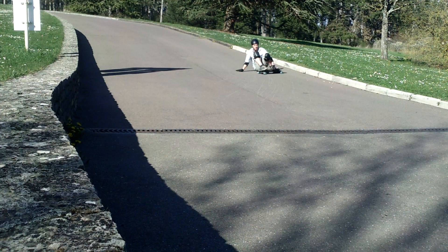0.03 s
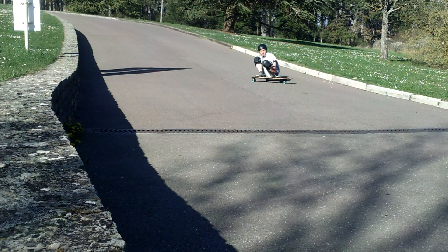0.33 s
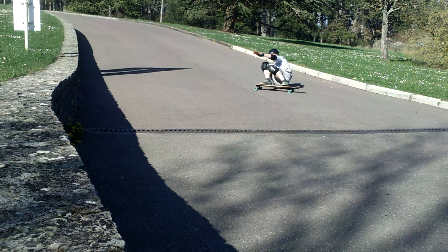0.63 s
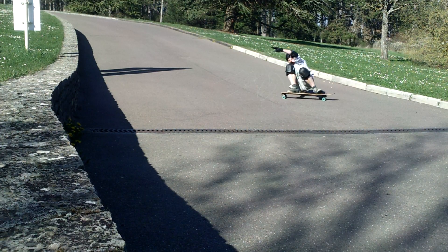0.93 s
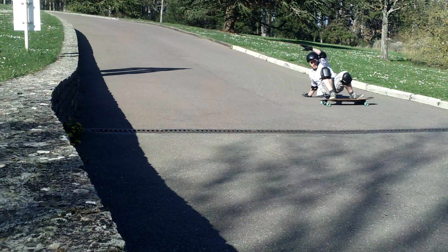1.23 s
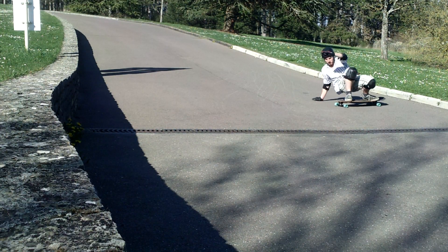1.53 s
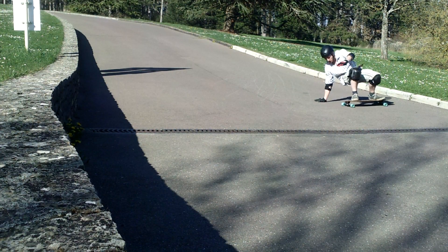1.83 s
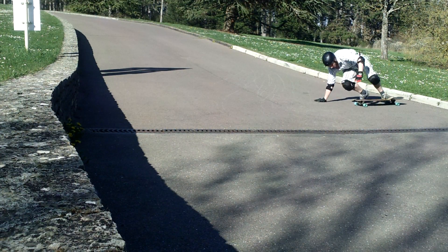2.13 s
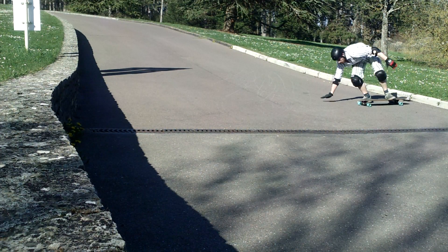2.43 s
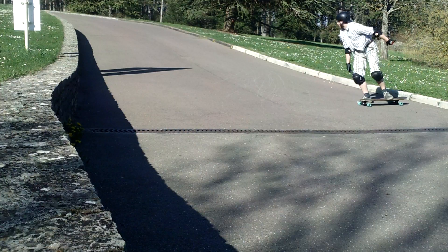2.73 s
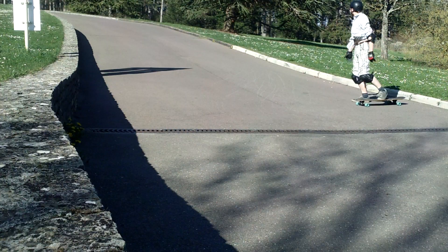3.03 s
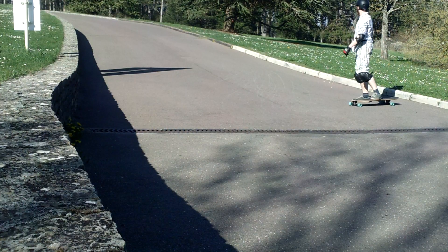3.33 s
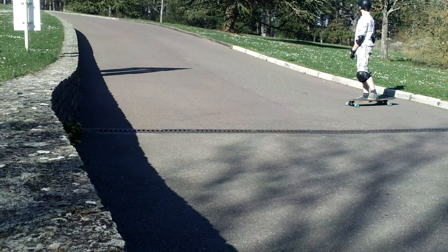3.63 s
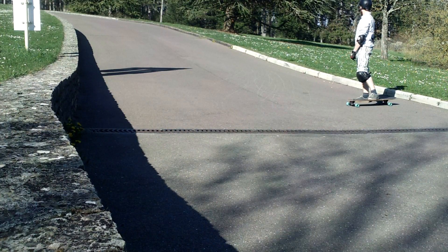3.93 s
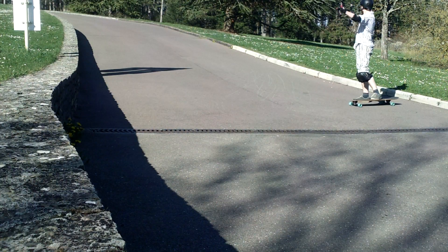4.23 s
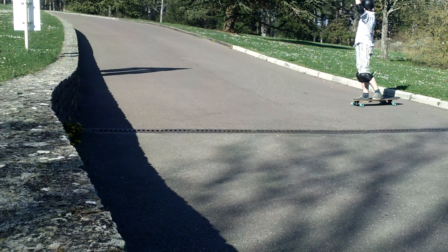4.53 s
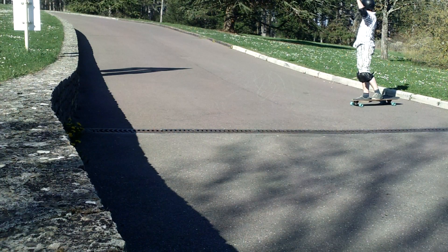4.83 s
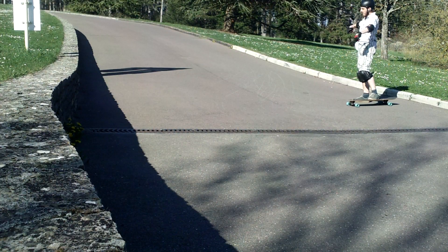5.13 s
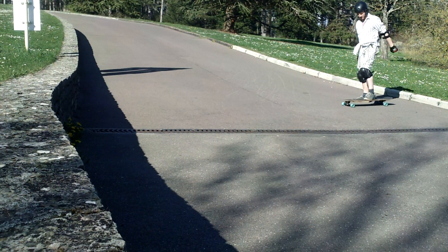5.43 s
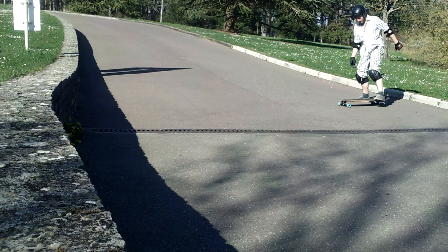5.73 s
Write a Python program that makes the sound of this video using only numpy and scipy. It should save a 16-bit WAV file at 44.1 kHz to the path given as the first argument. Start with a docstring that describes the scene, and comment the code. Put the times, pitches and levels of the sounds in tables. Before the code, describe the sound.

Longboard wheels rasp and squeal in a slide on asphalt, then gusts of wind buffet the microphone over faint birds.

```python
"""A longboard slides sideways down an asphalt park road. Its wheels stick and slip over the grit, so
they rasp, judder and squeal; stones crunch, a glove puck drags, a last short scrub stops the board
with a snap, and the deck clacks. As the board slows, gusts start to buffet the camera's microphone:
big eddies rumble, small ones slap the port. Small birds chirp in the trees over soft park air,
and the camera's electronics whine faintly."""
import sys
import numpy as np
from scipy import signal
from scipy.fft import rfft, irfft, next_fast_len
from scipy.io import wavfile
from scipy.ndimage import uniform_filter1d, map_coordinates

SR = 44100
rng = np.random.default_rng(int(sys.argv[2]) if len(sys.argv) > 2 else 0)


def bounce(signal):
    """Save signal as a 16-bit WAV file at the path given by the first command-line argument."""
    frames = np.transpose(np.atleast_2d(signal))
    limited = np.clip(frames, -1, 1)
    pcm = np.round(limited * 32767).astype(np.int16)
    wavfile.write(sys.argv[1], SR, pcm)


N = 260190
TIME_S = np.arange(N) / SR


def amp(db):
    """Decibels to gain."""
    return 10 ** (np.asarray(db) / 20)


def unit(x):
    """Scale to rms 1."""
    return x / np.sqrt(np.mean(x ** 2) + 1e-20)


def envelope(start_s, hold_s, attack_s, release_s):
    """Level in dB: 0 during the hold; attack and release are the times for 60 dB."""
    early_s = np.maximum(start_s - TIME_S, 0)
    late_s = np.maximum(TIME_S - start_s - hold_s, 0)
    return -60 * (early_s / attack_s + late_s / release_s)


def wobble(knots_per_s):
    """Smooth random curve."""
    steps = np.arange(0, N + 10, 10)
    curve = map_coordinates(rng.standard_normal(8192), [steps * knots_per_s / SR], mode="wrap")
    return np.interp(np.arange(N), steps, curve)


def colour(x, points):
    """Minimum-phase filter with the gain of the (Hz, dB) points."""
    size = 2 * next_fast_len(len(x) // 2 + SR // 10)
    hz, db = np.transpose(points)
    gain_db = np.interp(np.log(np.fft.rfftfreq(size, 1 / SR) + 1), np.log(hz), db)
    cepstrum = irfft(np.log(amp(gain_db)))
    cepstrum[1:size // 2] *= 2
    cepstrum[size // 2 + 1:] = 0
    return irfft(rfft(x, size) * np.exp(rfft(cepstrum)))[:len(x)]


def resonate(x, modes):
    """Ring x through (Hz, width Hz, dB) resonances with steep skirts."""
    size = 2 * next_fast_len(N // 2 + SR // 10)
    f = np.fft.rfftfreq(size, 1 / SR)
    response = sum(amp(db) * (2j * f * width / (hz * hz - f * f + 2j * f * width)) ** 2
                   for hz, width, db in modes)
    return irfft(rfft(x, size) * response)[:N]


def add(track, start_s, sound):
    """Mix a sound into the track."""
    start = max(round(start_s * SR), 0)
    track[start:start + len(sound)] += sound[:N - start]


# Each row: frequency in Hz, gain in dB.
AIR_SPECTRUM = [(60, 4.5), (170, -0.5), (300, -8), (900, -18), (2000, -23), (3200, -25.5), (4200, -22),
                (5400, -30.5), (9000, -30.5), (15600, -33.5), (17000, -39)]
def park_air(level_db=-50.5):
    """Soft, low noise that sways slightly."""
    return amp(level_db + 0.4 * wobble(2)) * unit(colour(rng.standard_normal(N), AIR_SPECTRUM))


# Each row: frequency in Hz, rms level in dB.
WHINE_TONES = [(7897, -72), (15735, -79.5)]
def camera_whine():
    """The electronics give thin tones with jittering phase."""
    return sum(amp(db) * np.sqrt(2) * np.sin(2 * np.pi * hz * TIME_S + .6 * wobble(50))
               for hz, db in WHINE_TONES)


# Each note shape: length in seconds, glide in octaves, arch in octaves, hoarseness 0-1.
WHISTLE, BUZZ = (0.06, 0, 0.008, 0.08), (0.08, -0.14, 0, 0.88)
RISE, FALL = (0.011, 0.38, 0.017, 0.24), (0.03, -0.16, 0.02, 0.12)
ARCH, SLUR = (0.088, -0.12, 0.23, 0.25), (0.038, 0.293, 0.035, 0.26)
# Each row: start in seconds, mid-note pitch in Hz, level in dB, note shape.
BIRD_NOTES = [(2.66, 4470, -58.5, BUZZ), (2.925, 4760, -63, WHISTLE), (3.002, 3380, -60, FALL),
              (3.057, 3640, -50.5, RISE), (3.183, 3380, -57, FALL), (3.263, 3220, -58, FALL),
              (3.659, 4020, -57.5, BUZZ), (3.842, 3300, -53.5, RISE), (4.01, 4770, -66, WHISTLE),
              (4.23, 3785, -57, ARCH), (4.405, 3580, -62, SLUR), (4.438, 4070, -62, WHISTLE),
              (5.21, 4026, -66, WHISTLE), (5.305, 3790, -60.5, ARCH)]
def birds(far_per_s=5, far_hz=3970, far_db=-65, waver=0.066, echo_db=-5, t60_s=0.59):
    """Gliding whistles, scattered by the trees; farther birds twitter at random."""
    track, drift = np.zeros(N), wobble(500)
    shapes = [WHISTLE, FALL, SLUR]
    draws = rng.random((int(far_per_s * N / SR), 2))
    far = [(when * (N / SR - .5), far_hz * 2 ** ((height - .5) / 2), far_db, shapes[i % len(shapes)])
           for i, (when, height) in enumerate(draws)]
    for start_s, middle_hz, db, (length_s, glide, arch, hoarse) in BIRD_NOTES + far:
        u = np.linspace(-1, 1, int(length_s * SR))
        pitch_hz = middle_hz * 2 ** (glide * u / 2 - arch * u ** 2)
        pitch_hz *= 1 + waver * hoarse * drift[int(start_s * SR):][:len(u)]
        swell = np.sqrt(np.abs(np.cos(np.pi * u / 2)))
        add(track, start_s, amp(db) * swell * np.sin(2 * np.pi * np.cumsum(pitch_hz) / SR))
    t = np.arange(SR // 2) / SR
    tail = rng.standard_normal(len(t)) * amp(-60 * t / t60_s)
    return track + amp(echo_db) * signal.fftconvolve(track, tail / np.linalg.norm(tail))[:N]


BREEZE_DB = -46
# Each row: start in seconds, hold in seconds, pressure level in dB.
GUSTS = [(1.218, 0.14, -29), (1.398, 0.091, -34.5), (2.195, 0.11, -26), (2.296, 0.2, -22),
         (2.54, 0.038, -21.5), (2.641, 0.058, -22), (2.736, 0.18, -20), (2.983, 0.34, -18),
         (3.378, 0.22, -18), (3.628, 0.12, -20.5), (3.765, 0.095, -21.5), (3.891, 0.096, -23),
         (4.044, 0.11, -24.5), (4.251, 0.12, -27.5), (4.848, 0.31, -29.5), (5.083, 0.041, -23.5)]
def airflow(attack_s=0.14, release_s=0.14, strong_gust_db=-17.5, strong_eddy_db=-22, eddy_growth=3.38):
    """Levels in dB of gusts over a light breeze, and of their small eddies, which grow much faster."""
    gusts_db = [db + envelope(start_s, hold_s, attack_s, release_s) for start_s, hold_s, db in GUSTS]
    pressure_db = np.maximum(np.max(gusts_db, axis=0), BREEZE_DB - 0.5 * wobble(18))
    return pressure_db, strong_eddy_db + eddy_growth * (pressure_db - strong_gust_db)


# Each row: frequency in Hz, gain in dB.
RUMBLE_SPECTRUM = [(10, -41.5), (25, -3.5), (45, 4), (70, 2.5), (130, -5.5), (200, -16.5), (400, -50),
                   (4000, -110)]
EDDY_SPECTRUM = [(40, -54), (130, 7.5), (210, 2), (320, -4.5), (480, -14), (700, -30), (1100, -52.5),
                 (8000, -103)]
def wind(pressure_db, eddy_db):
    """Big eddies rumble, small ones break on the microphone port; both flutter together."""
    flutter = wobble(45)
    rumble = unit(amp(2 * flutter) * colour(rng.standard_normal(N), RUMBLE_SPECTRUM))
    lumps = rng.standard_normal(N) * amp(2.2 * flutter + 6.5 * wobble(260))
    return amp(pressure_db - 1.2) * rumble + amp(eddy_db) * unit(colour(lumps, EDDY_SPECTRUM))


def vortex_swing(width_s):
    """Pressure swing of one vortex passing the port; smaller vortices sound higher."""
    u = np.arange(-(SR // 40), SR // 40) / SR / width_s
    shape = u / (1 + u * u) ** 2 * signal.windows.hann(len(u))
    return shape / shape.max()


# Each row: time in seconds, thud level in dB, wake level in dB.
SLAPS = [(1.267, -17.5, -48), (1.29, -11, -45), (1.318, -21.5, -50), (2.37, -12.5, -30),
         (2.384, -14.5, -33), (2.6, -19, -34), (2.621, -13, -28.5), (2.762, -32, -30), (2.786, -14.5, -33),
         (2.829, -9, -20.5), (2.837, -14, -20.5), (2.857, -10.5, -29), (2.895, -13, -22),
         (3.037, -13.5, -33), (3.106, -9, -17.5), (3.137, -6, -30.5), (3.265, -12, -16),
         (3.286, -6.5, -15.5), (3.37, -8.5, -11), (3.422, -13, -19), (3.452, -14, -37), (3.485, -14.5, -22),
         (3.535, -5, -16.5), (3.581, -14, -15.5), (3.617, -9.5, -29), (3.665, -12, -24), (3.681, -13, -26),
         (3.835, -12, -33.5), (4.078, -14.5, -36), (4.097, -13, -29.5), (4.309, -17.5, -70),
         (5.081, -20, -51)]
# Each row: frequency in Hz, gain in dB.
WAKE_SPECTRUM = [(30, -28), (120, -5.5), (250, 7), (420, 1), (700, -6), (1000, -19.5), (1400, -34),
                 (2000, -45), (8000, -58)]
def slaps(eddy_db, weak_per_s=30, width_s=0.0009, sharpen=0.31, top_hz=560, t60_s=0.033, rise_s=0.0021):
    """Each vortex gives a dull thud, quicker when strong, and a turbulent wake; weak ones are random."""
    thuds, wakes, t = np.zeros(N), np.zeros(N), np.arange(SR // 10) / SR
    weak_db = eddy_db + 7.5 + 5 * rng.standard_normal(N)
    passing = np.flatnonzero((rng.random(N) < weak_per_s / SR) & (weak_db > BREEZE_DB))
    weak = [(i / SR, weak_db[i], weak_db[i] - 19) for i in passing]
    for at_s, thud_db, wake_db in list(SLAPS) + weak:
        thud = vortex_swing(width_s * amp(-sharpen * thud_db))
        add(thuds, at_s - len(thud) / 2 / SR, amp(thud_db) * thud)
        add(wakes, at_s - rise_s, amp(wake_db - 60 * t / t60_s) * np.minimum(t / rise_s, 1))
    thuds = signal.sosfiltfilt(signal.butter(2, top_hz, fs=SR, output="sos"), thuds)
    turbulence = rng.standard_normal(N)
    return thuds + colour(wakes * turbulence, WAKE_SPECTRUM) / colour(turbulence, WAKE_SPECTRUM).std()


# Each row: start in seconds, peak in dB.
POPS = [(3.105, -25.5), (3.535, -24.5)]
# Each row: frequency in Hz, gain in dB.
POP_SPECTRUM = [(100, -10), (600, 2), (2000, -12.5), (4000, -26), (16000, -33.5)]
def pops():
    """Two hard slaps on the port also pop sharply."""
    track = np.zeros(N)
    pop = colour(-signal.unit_impulse(SR // 10), POP_SPECTRUM)
    for start_s, db in POPS:
        add(track, start_s, amp(db) * pop / np.abs(pop).max())
    return track


# Each row: frequency in Hz, width in Hz, gain in dB.
DECK_MODES = [(550, 130, 18), (1460, 170, 4.5), (1900, 700, 6.5), (2950, 550, 2), (4400, 200, -17)]
# Each row: time in seconds, peak in dB.
CLACKS = [(2.271, -36.5), (3.16, -24.5)]
def deck_clacks(hold_s=0.0013, attack_s=0.019, release_s=0.013, top_hz=5000):
    """Knocks ring the deck as the wheels grip again and as the rider steps."""
    track = np.zeros(N)
    lowpass = signal.butter(4, top_hz, fs=SR, output="sos")
    for at_s, db in CLACKS:
        knock = rng.standard_normal(N) * amp(envelope(at_s, hold_s, attack_s, release_s))
        clack = signal.sosfilt(lowpass, resonate(knock, DECK_MODES))
        track += amp(db) * clack / np.abs(clack).max()
    return track


# Each row: start in seconds, hold in seconds, level in dB, sag in dB per second, release in seconds.
SCRUBS = [(1.54, 0.26, -43.5, 21.5, 0.28), (2.206, 0.073, -43.5, 12, 0.049)]
# Each row: frequency in Hz, gain in dB.
SCRAPE_SPECTRUM = [(100, 8.5), (700, -3), (2000, 0.5), (2500, 5), (3000, 8), (3900, 10.5), (4600, 4.5),
                   (5500, -5), (8000, -22.5), (16000, -89)]
def scrub(roll_db=-61.5, attack_s=0.44):
    """At low speed puck and wheels scrape more dully, then fade into quiet rolling."""
    level_db = roll_db + envelope(start_s=2.03, hold_s=1.6, attack_s=1.3, release_s=0.75)
    for start_s, hold_s, db, sag_db_per_s, release_s in SCRUBS:
        sag_db = sag_db_per_s * np.clip(TIME_S - start_s, 0, hold_s)
        level_db = np.maximum(level_db, db - sag_db + envelope(start_s, hold_s, attack_s, release_s))
    return amp(level_db + 2.1 * wobble(110)) * unit(colour(rng.standard_normal(N), SCRAPE_SPECTRUM))


# Each row: start in seconds, level in dB.
STONE_HITS = [(0.217, -12.5), (0.359, -13.5), (0.434, -15), (0.4992, -16.5), (0.623, -18), (2.144, -34),
              (2.269, -25), (2.309, -36.5), (2.334, -44), (2.406, -37.5)]
def stones(t60_s=0.033, trim_db=-3, deck_db=-11):
    """Each struck stone crunches in the colour of the scrape and lightly rings the deck."""
    track, t = np.zeros(N), np.arange(SR // 20) / SR
    for start_s, db in STONE_HITS:
        crunch = colour(rng.standard_normal(len(t)) * amp(-60 * t / t60_s), SCRAPE_SPECTRUM)
        add(track, start_s, amp(db + trim_db) * crunch / np.abs(crunch).max())
    return track + amp(deck_db) * resonate(track, DECK_MODES)


# Each row: start and hold in seconds, first and last pitch in Hz, level in dB, line width in Hz.
SQUEALS = [(0.102, 0.138, 1101, 1055, -29.5, 42), (0.221, 0.125, 1055, 1042, -35, 40),
           (0.44, 0.076, 612, 606, -30.5, 21), (0.53, 0.87, 606, 580, -40.5, 19),
           (0.4, 0.9, 1775, 1730, -45.5, 34), (0.6, 0.72, 1080, 1045, -49.5, 20),
           (0.17, 0.054, 4000, 2800, -37.5, 120), (0.79, 0.134, 3870, 3500, -37.5, 150),
           (1.6, 0.2, 2400, 2820, -51, 150), (1.64, 0.0066, 750, 740, -52.5, 18)]
def squeals(attack_s=0.082, release_s=0.2, sag_db_per_s=8, rough_hz=26.4):
    """Stick-slip locks a wheel onto a mode: the tone swells, sags and rings out, roughened by the road."""
    track, shake = np.zeros(N), wobble(40)
    for start_s, hold_s, first_hz, last_hz, db, width_hz in SQUEALS:
        pitch_hz = np.interp(TIME_S, [start_s, start_s + hold_s], [first_hz, last_hz])
        pitch_hz += width_hz * shake / 2
        carrier = np.exp(2j * np.pi * np.cumsum(pitch_hz) / SR)
        # Lines wider than rough_hz are more noise than tone.
        grain = rough_hz + width_hz * (wobble(np.pi * width_hz) + 1j * wobble(np.pi * width_hz))
        sag_db = sag_db_per_s * np.clip(TIME_S - start_s, 0, hold_s)
        level_db = db - sag_db + envelope(start_s, hold_s, attack_s, release_s)
        track += amp(level_db) * unit(np.real(grain * carrier))
    return track


def grit(hits_per_s, spread_db):
    """Tiny impacts of uneven size on the road's grains."""
    hits = (rng.random(N) < hits_per_s / SR) * rng.choice([-1, 1], N)
    return unit(hits * amp(spread_db * rng.standard_normal(N)))


def shifting_grip(x, modes, rise=0, shifts_per_s=45, surge_db=1.6, drift=0.008):
    """Each mode drifts and surges as the grip shifts; rise and drift are shares of its pitch."""
    n, total = np.arange(N), np.zeros(N)
    for mode in modes:
        offset = np.cumsum(drift * wobble(shifts_per_s) + rise)
        ringing = np.interp(n + offset, n, resonate(x, [mode]))
        total += amp(surge_db * wobble(shifts_per_s)) * ringing
    return unit(total)


# Each row: time in seconds, level in dB.
SLIDE_STRENGTH = [(0, -37.5), (0.07, -32), (0.2, -33), (0.57, -36.5), (0.63, -35.5), (0.74, -37),
                  (0.79, -34.5), (0.92, -35), (0.97, -36), (1.49, -37), (1.62, -51)]
# Each row: frequency in Hz, gain in dB.
RASP_SPECTRUM = [(80, -15.5), (900, -10), (2000, -17), (2900, -2.5), (3680, -0.5), (4200, -2), (5200, -13),
                 (7000, -19.5), (10200, -26.5), (12500, -36), (17000, -66.5)]
# Each row: frequency in Hz, width in Hz, gain in dB.
WHEEL_MODES = [(210, 62, -6), (411, 60, -5.5), (583.4, 50, 0.5), (700, 78, 0), (1135, 108, -5),
               (1664, 340, -8), (2300, 360, -7.5)]
SCREECH_MODES = [(3460, 410, -1.2), (3830, 200, 0.51)]
JUDDER_MODES = [(371, 72, 6), (669, 130, 4.5), (920, 310, -0.5)]
def wheels(slow_at_s=1.06, screech_rise_per_s=0.3):
    """Urethane sticks and slips on grit, juddering loose; once slow, ringing fades and screech climbs."""
    times_s, levels_db = np.transpose(SLIDE_STRENGTH)
    edges_s = np.r_[times_s[0] - .05, times_s, times_s[-1] + .05]
    slide_db = np.interp(TIME_S, edges_s, np.pad(levels_db, 1, constant_values=-120))
    ring_db = slide_db - 2.5 + envelope(start_s=0, hold_s=slow_at_s, attack_s=1, release_s=2.9)
    judder_db = -32.5 + envelope(start_s=0.096, hold_s=0.28, attack_s=9.5, release_s=0.35)
    rise = screech_rise_per_s * np.clip(TIME_S - slow_at_s, 0, 1)
    slips = unit(amp(1.28 * wobble(260) + 0.43 * wobble(80)))
    rasp = amp(slide_db - 0.5) * unit(colour(slips * grit(15000, spread_db=5.0), RASP_SPECTRUM))
    screech = amp(slide_db - 6) * shifting_grip(slips * rng.standard_normal(N), SCREECH_MODES, rise)
    ring = amp(ring_db) * shifting_grip(slips * grit(5000, spread_db=-0.5), WHEEL_MODES)
    judder = amp(judder_db) * unit(resonate(slips * grit(2200, spread_db=3.5), JUDDER_MODES))
    return rasp + screech + ring + judder


def scene():
    """Board, park and wind at one microphone."""
    board = wheels() + squeals() + scrub() + stones() + deck_clacks()
    park = birds() + park_air() + camera_whine()
    pressure_db, eddy_db = airflow()
    return (board + park + wind(pressure_db, eddy_db) + slaps(eddy_db) + pops())[None]


def record(dry):
    """The camera turns down a little after the loudest gusts, recovers slowly, and has a band limit."""
    threshold_db, slope, recovery_db_per_s, top_hz = -19, .48, 1.6, 17100
    power = np.abs(uniform_filter1d(dry[0] ** 2, size=SR // 50))
    excess_db = np.maximum(10 * np.log10(power + 1e-12) - threshold_db, 0)
    recovery_db = recovery_db_per_s * TIME_S
    cut_db = np.maximum.accumulate(slope * excess_db + recovery_db) - recovery_db
    passband = np.fft.rfftfreq(N, 1 / SR) < top_hz
    return irfft(rfft(dry * amp(-cut_db)) * passband, N)


dry = scene()
out = record(dry)
bounce(out)
```